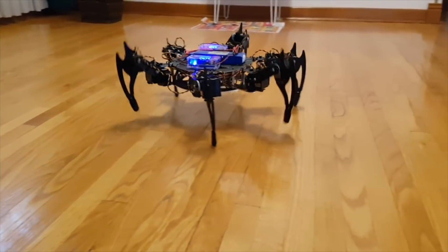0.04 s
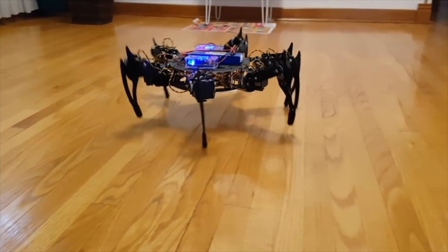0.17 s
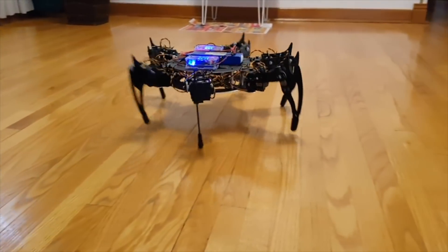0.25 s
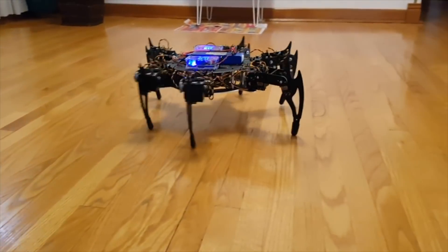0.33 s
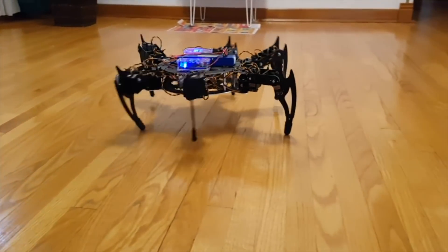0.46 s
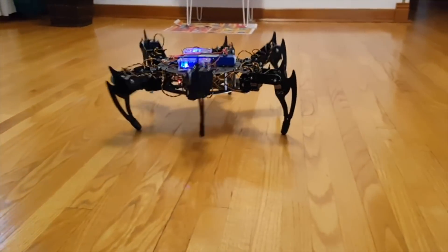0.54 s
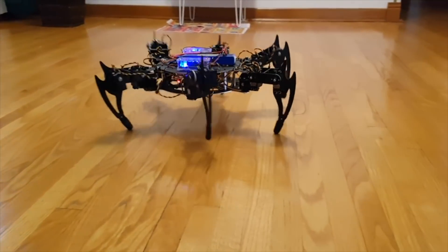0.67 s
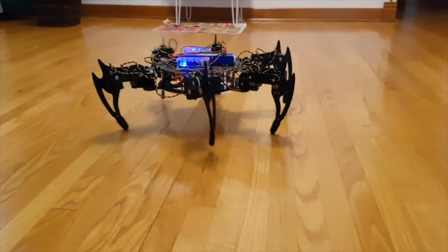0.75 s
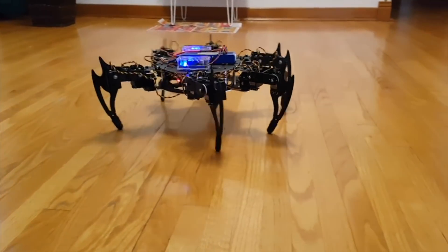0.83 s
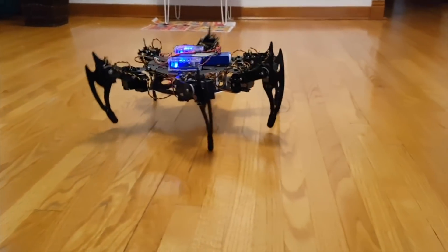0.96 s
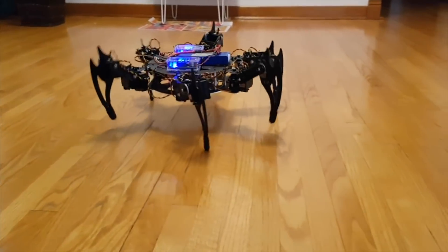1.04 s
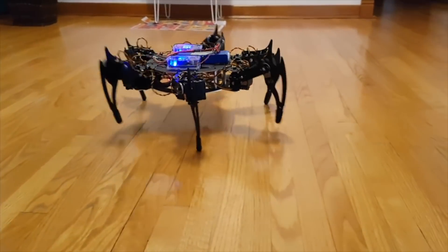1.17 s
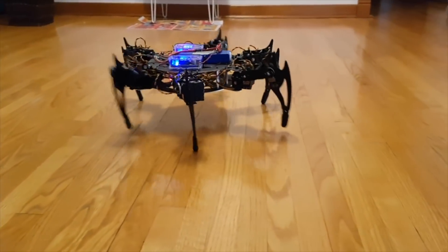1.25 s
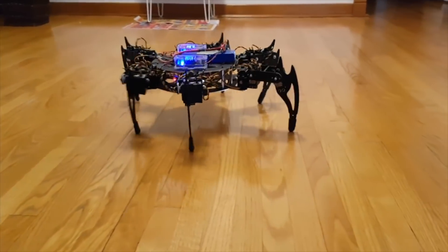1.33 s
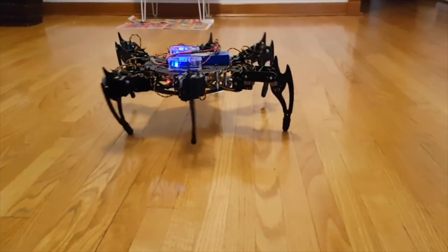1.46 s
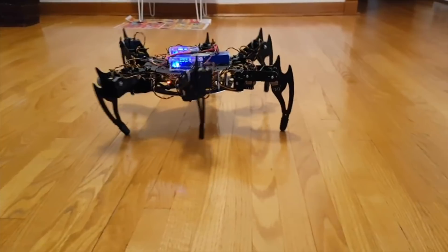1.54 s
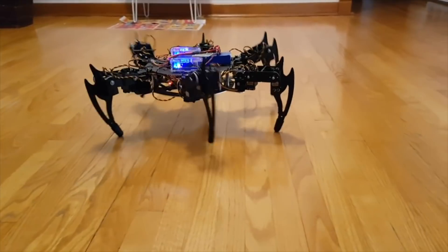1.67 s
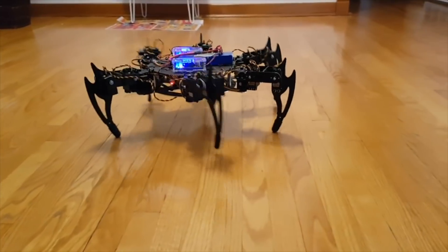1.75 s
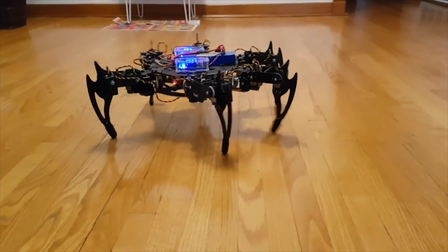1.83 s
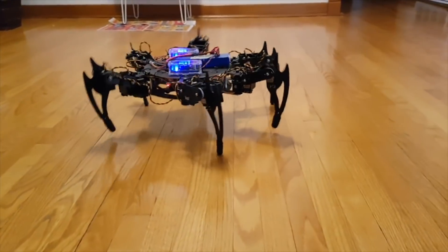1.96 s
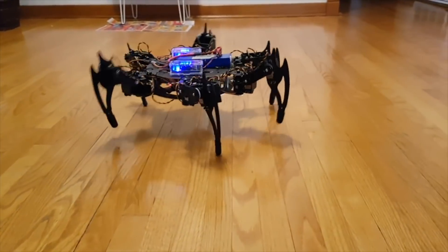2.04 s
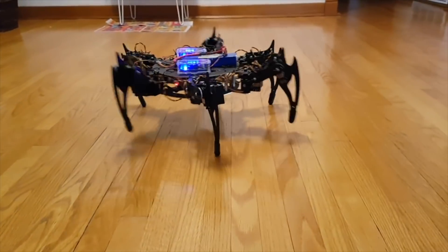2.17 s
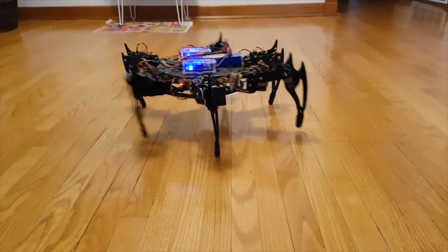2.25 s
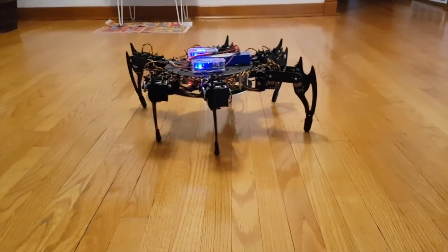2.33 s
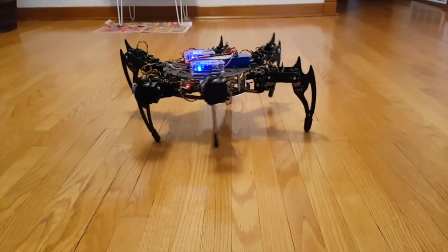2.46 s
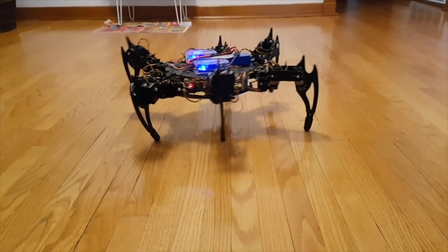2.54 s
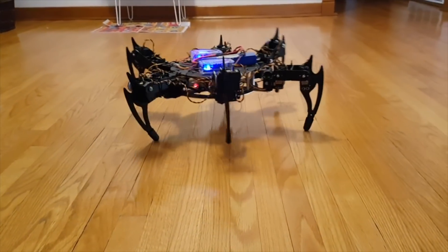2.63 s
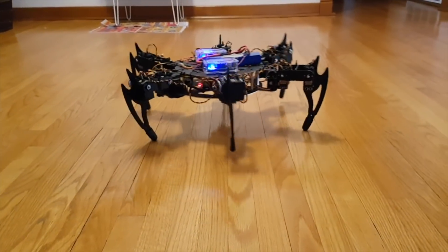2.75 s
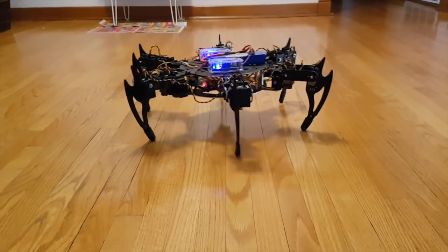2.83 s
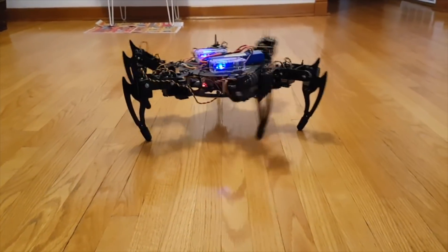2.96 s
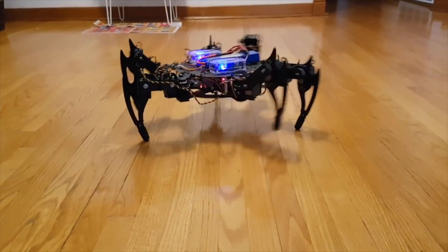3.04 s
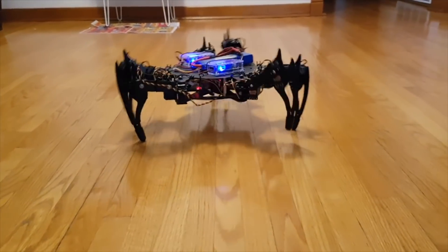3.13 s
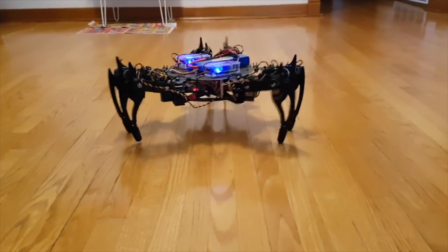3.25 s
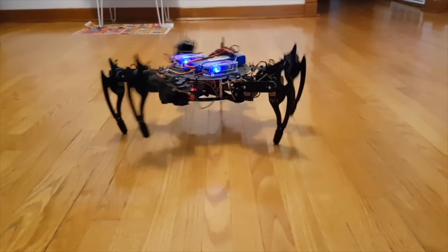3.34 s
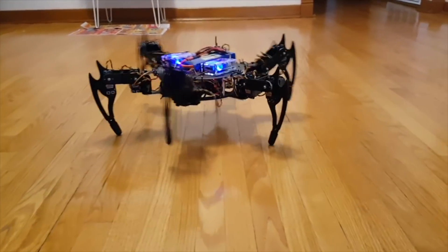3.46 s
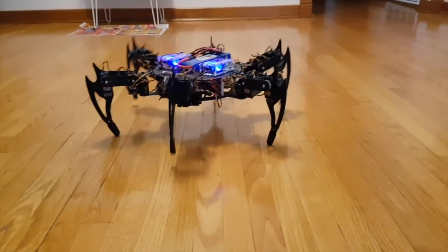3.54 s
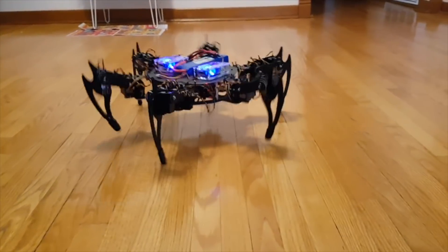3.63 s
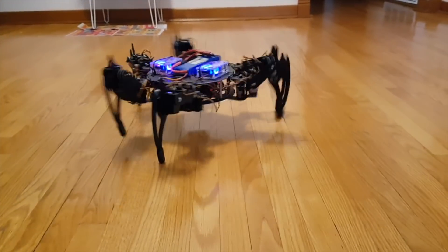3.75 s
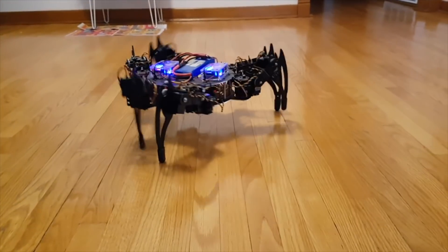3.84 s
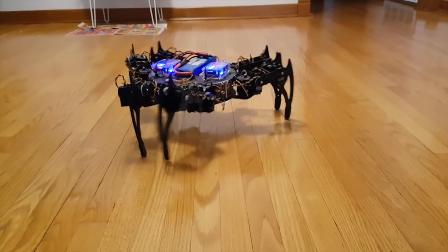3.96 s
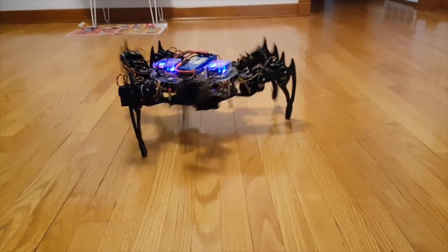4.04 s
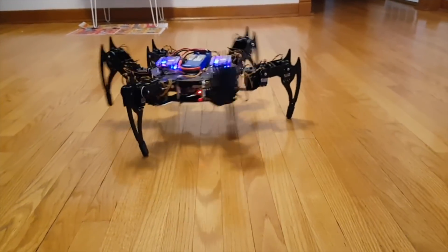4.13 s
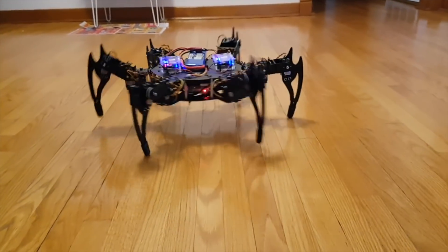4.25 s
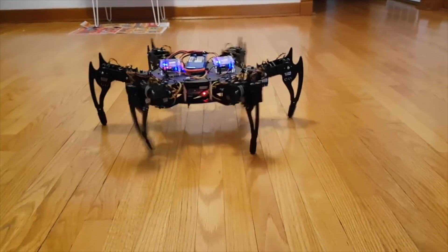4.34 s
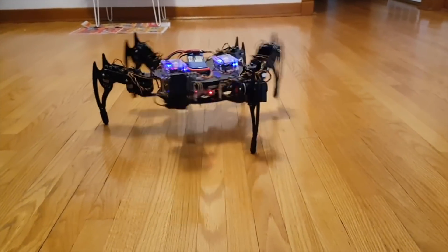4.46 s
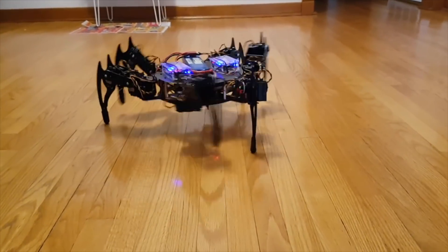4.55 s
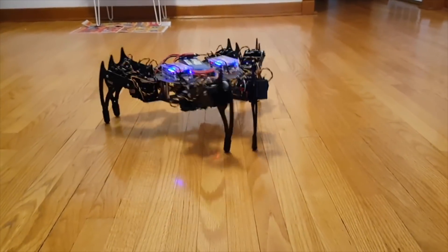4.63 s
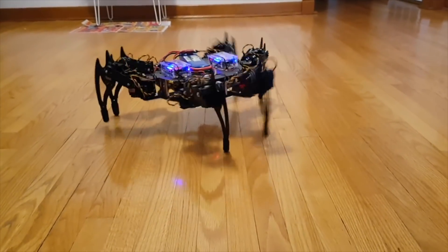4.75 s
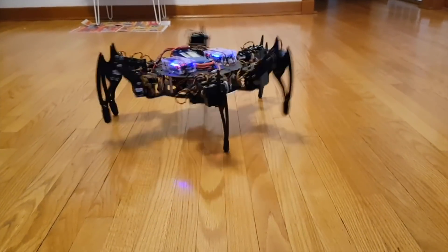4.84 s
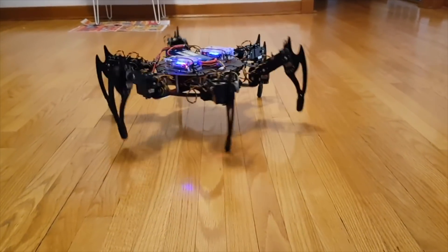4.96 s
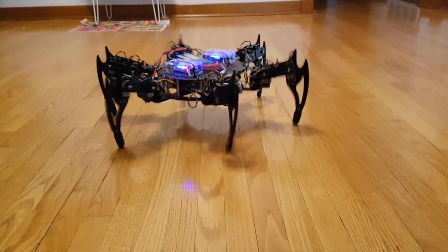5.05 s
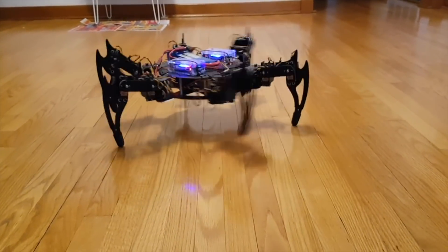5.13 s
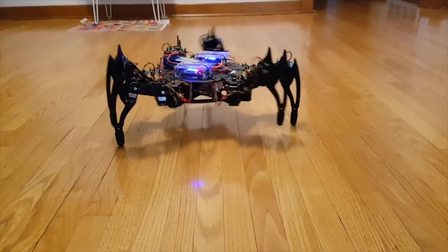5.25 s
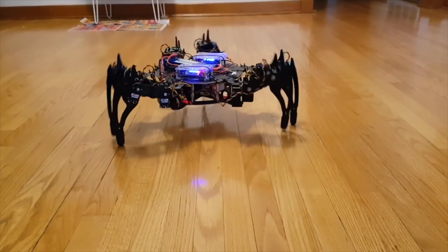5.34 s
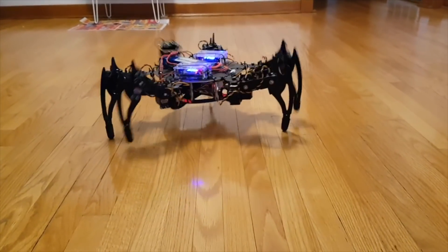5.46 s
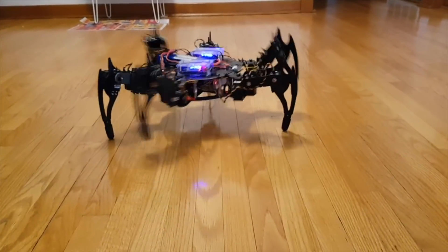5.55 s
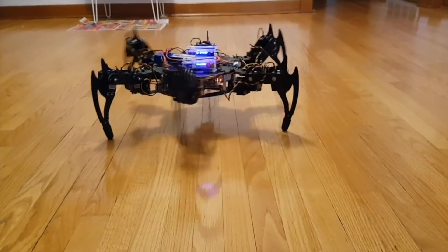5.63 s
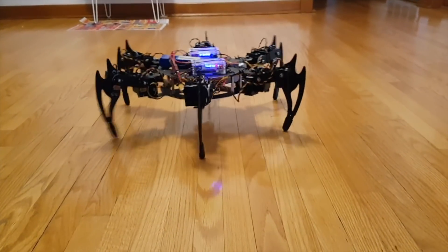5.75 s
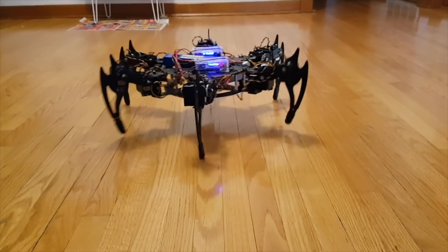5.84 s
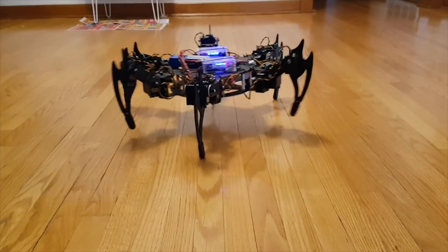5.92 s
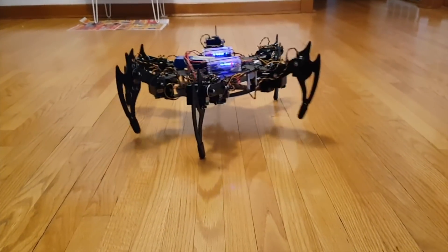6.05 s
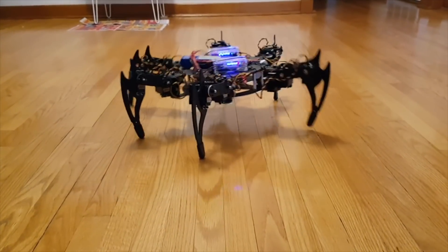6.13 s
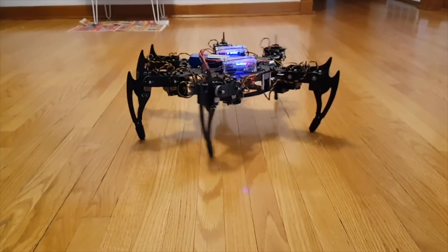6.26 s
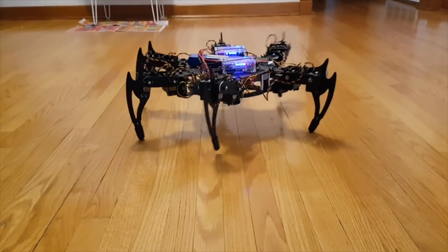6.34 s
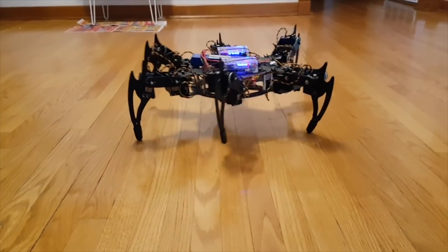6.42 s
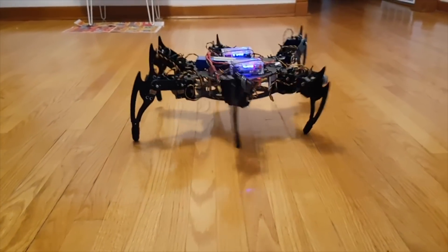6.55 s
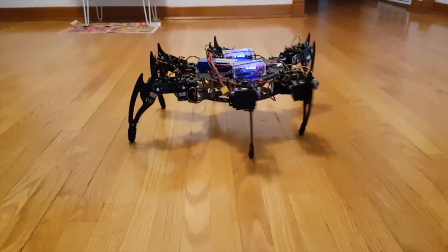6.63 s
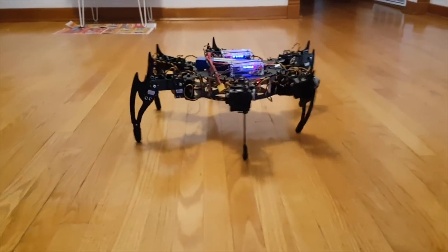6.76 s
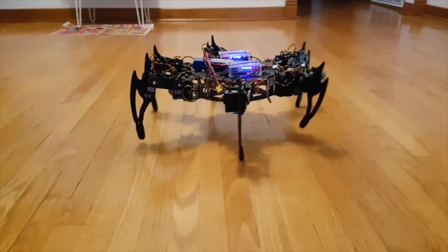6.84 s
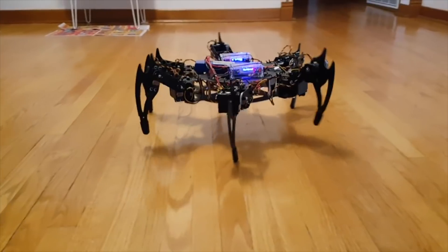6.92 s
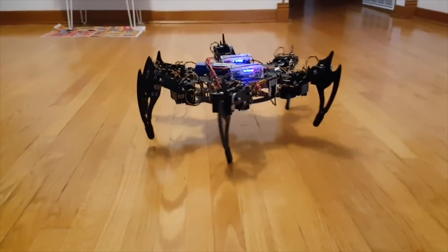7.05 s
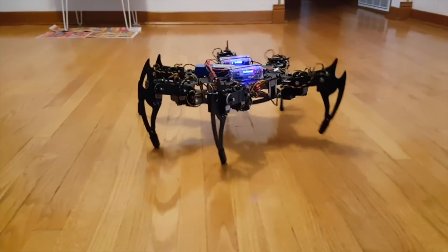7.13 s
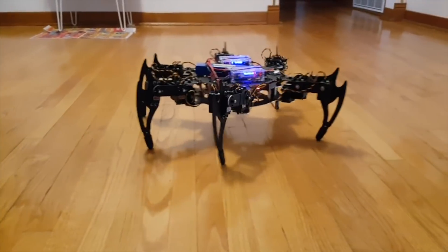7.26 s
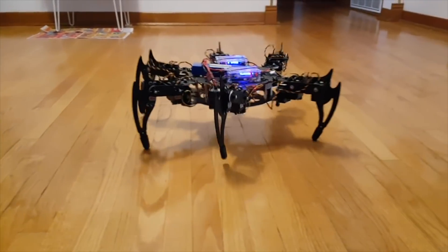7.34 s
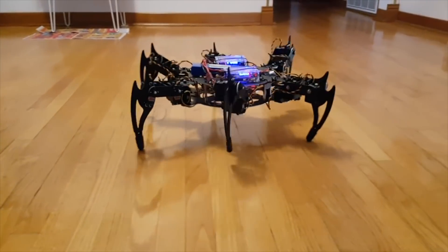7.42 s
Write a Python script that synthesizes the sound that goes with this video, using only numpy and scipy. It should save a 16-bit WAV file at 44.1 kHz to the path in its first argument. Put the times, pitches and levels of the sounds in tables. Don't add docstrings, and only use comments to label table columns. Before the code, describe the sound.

Close in a bare room, a small six-legged robot steps on wooden boards. Grainy servo chatter with a thin high whine pulses continuously over a low rumble and faint steady hiss. Soft muffled foot thuds come in little clusters every half second at first, then grow stronger and quicker with hard ticks as it turns, and finally ease back to lighter steps. The stereo pickup is near, with short room reverberation.

```python
import sys
import numpy as np
from scipy import signal
from scipy.fft import rfft, irfft
from scipy.io import wavfile

SR = 44100
rng = np.random.default_rng(int(sys.argv[2]) if len(sys.argv) > 2 else 0)


def convert_level_to_amplitude(level_db):
    exponent = np.asarray(level_db, float) / 20
    return 10 ** exponent


def dump_mix(stems):
    frames = np.atleast_2d(stems).T
    limited = np.clip(frames, -1, 1)
    pcm = np.round(limited * 32767).astype(np.int16)
    wavfile.write(sys.argv[1], SR, pcm)


N = 330309


def rms_one(x):
    return x / np.sqrt(np.mean(x ** 2) + 1e-20)


def in_time(rows):
    start_s, *columns = np.transpose(rows)
    return [np.interp(np.arange(N) / SR, start_s, column) for column in columns]


def at_hz(points, hz):
    table_hz, value = np.array(points)[:, 0], np.array(points)[:, 1]
    return np.interp(np.log(hz), np.log(table_hz), value)


def drift(rate_hz):
    pole = np.exp(-80 * np.pi * rate_hz / SR)
    noise = rng.standard_normal(N // 40 + 2002)
    slow = signal.lfilter([1], [1, -2 * pole, pole * pole], noise)[2000:]
    return np.interp(np.arange(N) / 40, np.arange(len(slow)), rms_one(slow))


# freq_hz [Hz], likeness [-1 to 1]
LIKENESS = [(60, 1), (180, 1), (550, 0.64), (1650, 0.19), (4970, 0.21), (15000, 0.012)]


def bands(source, low_hz, high_hz, count=3, apart=0):
    edges = 25 * 2 ** (np.arange(10 * count) / count)
    edges = edges[(edges >= low_hz) & (edges <= high_hz)]
    for k, (low, high) in enumerate(zip(edges, edges[1:])):
        band_pass = signal.butter(2, [low, high], "band", fs=SR, output="sos")
        mid, side = signal.sosfilt(band_pass, source[k % 2])
        hz = np.sqrt(low * high)
        alike = np.clip(at_hz(LIKENESS, hz) - apart, -.5, .94)
        yield hz, np.sqrt(1 + alike) * mid + np.sqrt(1 - alike) * side * [[1], [-1]]


def whine(pitch_hz, width_hz):
    wobble = rng.standard_normal((2, N)) + 1j * rng.standard_normal((2, N))
    narrow = signal.sosfilt(signal.butter(2, width_hz / 2, fs=SR, output="sos"), wobble)
    carrier = np.exp(2j * np.pi * np.cumsum(pitch_hz) / SR)
    return rms_one((narrow * carrier).real)


def strike(modes, rise_s):
    t = np.arange(SR // 3) / SR
    hz, level_db, t60_s = np.transpose(modes)[:, :, None]
    ringing = convert_level_to_amplitude(level_db - 60 * t / t60_s) * np.sin(2 * np.pi * hz * t)
    return (1 - np.exp(-t / rise_s)) * np.sum(ringing, axis=0)


def varied(modes, luck, spread, spread_db):
    hz, level_db, t60_s = np.transpose(modes)
    return np.transpose([hz * (1 + spread * luck[0]), level_db + spread_db * luck[1], t60_s])


def add(track, sound, start_s):
    at = round(start_s * SR)
    track[at:at + len(sound)] += sound[:N - at]


# [upper board modes, dB]
FIRST_FEET = [(0.386, -23.5, 161, -8), (0.881, -41.5, 209, 4.5), (1.411, -36, 160, -3),
              (1.891, -26, 145, -10), (2.396, -39.5, 148, 2), (2.867, -23.5, 143, -19.5),
              (3.2989, -23.5, 223, -11.5), (3.688, -13.5, 165, -5.5), (4.008, -26, 178.3, -12.5),
              (4.416, -17.5, 270, -11), (4.705, -15.5, 179, -19.5), (5.1313, -18, 149, -5.5),
              (5.459, -25, 208, -3), (5.85, -12.5, 188.4, -14), (6.204, -24, 154, -3),
              (6.7347, -25.5, 260, 0), (7.2353, -23.5, 113.2, -5.5)]
SECOND_FEET = [(0.394, -24, 163, -27.5), (0.89, -25.5, 143, -14), (1.422, -27, 187, -12),
               (1.929, -28, 167, -38), (2.407, -24, 136, -30), (2.893, -23, 187, -33),
               (3.348, -13, 193, -9.5), (3.703, -7.5, 165.4, -10.5), (4.021, -20.5, 139, -12),
               (4.428, -8.5, 199, -6.5), (4.724, -21.5, 169, -28.5), (5.155, -7, 177, -8),
               (5.481, -19, 152, -7.5), (5.868, -10.5, 142, -13), (6.223, -18.5, 189, -6.5),
               (6.756, -23, 128, -12), (7.255, -20, 168, -44)]
THIRD_FEET = [(0.415, -32.5, 117, -6), (0.941, -31, 139, -19), (1.455, -44, 162, -10),
              (2.447, -30.5, 164, -29), (2.925, -28, 138, -30), (3.364, -19, 189, -24),
              (3.726, -25, 182, -19), (4.06, -18.5, 189, -29), (4.453, -12.5, 153, -8),
              (4.77, -28.5, 170.7, -13), (5.196, -26, 151, -20), (5.532, -24.5, 186, -14),
              (5.894, -21, 165, -14.5), (6.235, -12.5, 179, -33), (6.799, -31, 183, -16),
              (7.316, -24.5, 173, -32)]
STRAY_FEET = [(2.983, -35, 169, -18), (3.308, -20.5, 165, -6), (3.323, -33, 184, -8),
              (3.414, -38, 153, -25), (4.054, -29.5, 234, -22), (5.146, -19.5, 184, -8),
              (6.245, -16.5, 178.4, -27), (6.286, -30, 188, -3), (6.292, -29.5, 184, -20),
              (6.8076, -19, 154, -26), (7.287, -23, 156, -30), (7.338, -25.5, 185, -30),
              (7.358, -33.5, 170, -33.5), (7.378, -34.5, 163, -30), (5.504, -21, 170, -21.5),
              (6.828, -31, 152, -18)]


def landings():
    last = np.array(THIRD_FEET)
    rebounds = last + [0.057, -17, 0, 0]
    return np.vstack([FIRST_FEET, SECOND_FEET, last, rebounds, STRAY_FEET])


# freq_hz [Hz], level_db [dB per Hz]
HISS_SPECTRUM = [(300, -5), (1000, -2.5), (2200, -1), (4000, -5.5), (13000, -14), (15500, 0.5)]
HISS_DB = -54.5


def hiss():
    slices = bands(rng.standard_normal((2, 2, N)), low_hz=240, high_hz=17000)
    return convert_level_to_amplitude(HISS_DB) * rms_one(sum(convert_level_to_amplitude(at_hz(HISS_SPECTRUM, hz)) * band for hz, band in slices))


# start_s [s], level_db [dB]
RUMBLE_LEVEL = [(0.0, -53), (1.8, -51.5), (3.2, -51), (4.2, -50), (5.3, -54.5), (6.4, -54), (7.49, -55.5)]
# freq_hz [Hz], level_db [dB per Hz]
SHAKE_SPECTRUM = [(15, -36), (25, -5.5), (75, -8.5), (107, -0.5), (201, -12), (263, -17.5), (366, -49),
                  (389, -21), (502, -23), (900, -34), (1170, -61), (1980, -120)]
AFTER_DB, AFTER_T60_S = -22.5, 0.27


def rumble():
    blows = np.zeros(N)
    for start_s, level_db, *_ in landings():
        blows[round(start_s * SR)] += convert_level_to_amplitude(level_db + AFTER_DB)
    after = signal.lfilter([1], [1, -convert_level_to_amplitude(-60 / (AFTER_T60_S * SR))], blows)
    steady = convert_level_to_amplitude(in_time(RUMBLE_LEVEL)[0] + 0.5)
    deep, hum = np.zeros((2, 2, N))
    for hz, band in bands(rng.standard_normal((2, 2, N + SR // 4)), low_hz=24, high_hz=1100):
        settled = band[:, -N:]
        part = convert_level_to_amplitude(at_hz(SHAKE_SPECTRUM, hz) + 1.84 * drift(6.8)) * settled
        if hz < 60:
            deep = deep + part
        else:
            hum = hum + part
    return (steady * deep + (steady + after) * hum) / np.std(deep + hum)


# start_s [centre, s], level_db [dB], length_s [s]
GROANS = [(.47, -59, 0.046), (.97, -61, 0.051), (1.45, -60, 0.043), (1.944, -55, 0.047), (2.47, -54, 0.055)]
GROAN_HZ = 1350


def groans():
    t = np.arange(N) / SR
    swell = sum(convert_level_to_amplitude(level_db) * np.exp(-.5 * ((t - start_s) / length_s) ** 2)
                for start_s, level_db, length_s in GROANS)
    return swell * whine(np.full(N, float(GROAN_HZ)), width_hz=130)


# [drop at the reversal, dB]
WALK_STROKES = [(-.05, -45.5, -5, -6, -11.5), (0.193, -45.5, 0.5, -4.5, 6.5), (0.451, -44.5, -5, -6, 2.5),
                (.70, -45, -2.5, -2.5, 4), (0.946, -44.5, -5.5, -6, 5.5), (1.192, -46, 0.5, -3.5, 4.5),
                (1.448, -45, -4.5, -5, 2), (1.70, -45, -2.5, -3, 4), (1.958, -45.5, -4, -5.5, 4),
                (2.191, -46.5, 0.5, -4, 5.5), (2.45, -44, -4.5, -7, 2), (2.701, -46, -4, -6, 4),
                (6.073, -46, -2, -9, 5), (6.349, -44, -4, -6, 7), (6.59, -45, -3.5, -5, 5.5),
                (6.829, -44.5, -2, -5.5, 5), (7.099, -45, -1.5, -4.5, 6), (7.328, -44.5, -4.5, -9, 5.5)]
TURN_STROKES = [(2.954, -40.5, -2, -2.5, 14), (3.29, -41.5, -2.5, -4.5, 5.5),
                (3.441, -43.5, -1.5, -2.5, -4), (3.65, -43.5, -0.5, -3, 3), (3.769, -42.5, -2.5, -1, -3),
                (3.967, -41.5, -2, -4.5, 6), (4.099, -41.5, -2, -2.5, 3), (4.386, -42, -3, -4, 5.5),
                (4.53, -42, -1.5, -0.5, -3.5), (4.683, -41, -3, -6.5, 2.5), (4.88, -43, 0, -1.5, -2.5),
                (5.099, -42.5, -2, -4.5, 5.5), (5.231, -43, -2, -2.5, -4), (5.43, -40.5, -2.5, -6, 6),
                (5.619, -43, 0.5, -1.5, -1.5), (5.83, -45.5, -4.5, -9, 1.5)]
# sag_db [fall along a stroke, dB], share [of the pause, ratio]
WALK_GAIT = ((-.6, -1.555, 3.1), (1.1, .4, 0.28))
TURN_GAIT = ((1.35, -0.0013, 1), (0.68, -0.0307, 0.022))
JOLT_SHARE, JOLT_S = 0.26, 0.055
PAUSE_S = 0.03


def effort():
    rows = [(*row, *WALK_GAIT) for row in WALK_STROKES] + [(*row, *TURN_GAIT) for row in TURN_STROKES]
    rows = sorted(rows)
    ends = [row[0] for row in rows[1:]] + [N / SR + 0.078]
    t = np.arange(N) / SR
    points, pauses_db, jolts_db = [], 0, 0
    for (start_s, *levels_db, pause_db, sag_db, shares), end_s in zip(rows, ends):
        for part in (.2, .8):
            sagged_db = np.array(levels_db) + (.5 - part) * np.array(sag_db) * 2
            points.append((start_s + part * (end_s - start_s), *sagged_db))
        dip = np.exp(-.5 * ((t - start_s) / PAUSE_S) ** 2)
        pauses_db = pauses_db + np.outer(shares, pause_db * dip)
    for first, second in zip(FIRST_FEET, SECOND_FEET):
        jolt_s = (first[0] + second[0]) / 2
        jolt_db = np.clip(JOLT_SHARE * (second[1] + 28), 0, 6)
        jolts_db = jolts_db + jolt_db * (t > jolt_s) * np.exp(-np.abs(t - jolt_s) / JOLT_S)
    return in_time(points) - pauses_db + np.outer([1, -1, -1], jolts_db)


# freq_hz [Hz], level_db [dB per Hz]
GEAR_SPECTRUM = [(1100, -20), (1400, -15), (2490, -15), (3300, -7.5), (4300, -6), (5300, -7.5),
                 (6200, -6.5), (7340, -4.5), (8200, -6), (9100, -1.5), (10400, -5), (13200, -9),
                 (13900, -21.5), (15800, -31)]
MESH_HZ, MESH_HZ_PER_DB = 5440, 55
AIR_HOLD = 0.45


def servos():
    chatter_db, whistle_db, top_db = effort()
    mesh_hz = MESH_HZ + MESH_HZ_PER_DB * whistle_db + 150 * drift(6.0)
    sizes = convert_level_to_amplitude(1.6 * np.minimum(rng.exponential(1, (2, 2, N)), 5)) * rng.choice([-1, 1], (2, 2, N))
    knocks = rms_one(sizes * (rng.random((2, 2, N)) < 9000 / SR))
    load_db = 1.55 * drift(13.8) + 0.41 * drift(170)
    chatter = 0
    for hz, band in bands(knocks, low_hz=780, high_hz=15800, count=5):
        whistle, top = np.clip(np.log2(hz / [6600, 10000]) * 11.0, 0, 1)
        lift_db = whistle * (1 - top) * (whistle_db - 3.5) + top * (top_db + 4.0)
        lift_db = lift_db - (hz > 13200) * AIR_HOLD * (chatter_db + top_db + 37.5)
        chatter = chatter + convert_level_to_amplitude(at_hz(GEAR_SPECTRUM, hz) + lift_db + load_db + 1.6 * drift(26.0)) * band
    main_db = -7.5 + 1.3 * (chatter_db + 42.5) + load_db + 2.0 * drift(15)
    main = convert_level_to_amplitude(main_db) * whine(mesh_hz, width_hz=290)
    others = 0
    for hz in (4460, 4880, 5570, 6010):
        fits = convert_level_to_amplitude(-10 + 2.4 * drift(15.0))
        others = others + fits * whine(hz * (1 + .03 * drift(4.3)), width_hz=330)
    motor_db = whistle_db - 2.5 + load_db + 1.0 * drift(39)
    motor = convert_level_to_amplitude(motor_db) * whine(np.full(N, 9150.), width_hz=1200)
    return convert_level_to_amplitude(chatter_db + 4.5) * rms_one(rms_one(chatter) + main + others + motor)


# freq_hz [Hz], t60_s [s]
ROOM_T60 = [(80, 0.2), (200, 0.33), (600, 0.56), (2000, 0.37), (6000, 0.61)]
# freq_hz [Hz], level_db [dB against the direct sound]
ROOM_WET = [(80, 3), (185, -7.5), (270, -7.5), (600, -6), (1000, -3.5), (1400, 0), (2200, -3.5),
            (3600, -4.5), (6000, -20)]


def room(x):
    t = np.arange(SR // 2) / SR
    tail = 0
    for hz, band in bands(rng.standard_normal((2, 2, len(t))), low_hz=38, high_hz=9000, apart=0.058):
        dying = convert_level_to_amplitude(-60 * t / at_hz(ROOM_T60, hz)) * np.clip((t - .004) / 0.0017, 0, 1)
        tail = tail + convert_level_to_amplitude(at_hz(ROOM_WET, hz)) * band * dying / np.sqrt(np.sum(dying ** 2))
    return x + signal.fftconvolve(x[None], tail, axes=1)[:, :N]


# [tip, Hz]
TICKS = [(0.386, -39, -1, 3470), (0.412, -35, -3, 3550), (0.451, -38, 1, 2920), (0.944, -38, -6, 1750),
         (1.411, -38, -7, 2430), (1.943, -41, 6, 1800), (2.412, -36, -1, 3770), (2.467, -40.5, 4, 3940),
         (3.331, -23.5, -12, 2314), (3.3496, -41, -11, 2200), (3.689, -32, 0.5, 2490),
         (3.693, -20, -0.5, 3400), (3.711, -35, -26, 2200), (4.019, -39, 1, 1740), (4.4286, -16, 0.5, 2500),
         (4.44, -17.5, -9.5, 2200), (4.707, -63, 14, 3230), (5.1324, -20, -5.5, 1970),
         (5.148, -19.5, -3, 2010), (5.4622, -39, 12, 2010), (5.477, -40, 7, 2010), (5.853, -42, 10, 2960),
         (5.87, -34, 0.5, 1530), (6.206, -39.5, 1.5, 1640), (6.227, -33, -3.5, 2000),
         (6.286, -31, -9, 1420), (6.738, -42, 5.5, 3310), (7.2416, -33.5, 3.5, 1990),
         (7.253, -39, -4, 1870), (6.7417, -38.5, 8, 3200), (3.353, -34, -12, 2200),
         (5.152, -28.5, -2, 1890)]
# freq_hz [Hz], level_db [dB], t60_s [s]
LEGS = [(585, -7.5, 0.074), (760, -9, 0.03), (966, 2.5, 0.025), (1370, 0, 0.018), (1570, 0.5, 0.021),
        (2200, 3.5, 0.012), (2560, 3, 0.0064), (3000, 0, 0.0098)]
TIP_GRIPS = 29
SCUFF_DB = -42
SNAP_RISE_S, RING_RISE_S = .0005, 0.00064
RATTLE_DB, RATTLE_T60_S = -14.5, 0.12


def ticks():
    out = np.zeros(N)
    chance = np.resize(rng.standard_normal((TIP_GRIPS, 2, len(LEGS))), (len(TICKS), 2, len(LEGS)))
    cracks = np.resize(rng.standard_normal((TIP_GRIPS, 3, SR // 3)), (len(TICKS), 3, SR // 3))
    dull = signal.butter(2, [480, 1250], "band", fs=SR, output="sos")
    broad = signal.butter(2, [1300, 4200], "band", fs=SR, output="sos")
    t = np.arange(SR // 3) / SR
    bright_share = np.clip(np.log2(np.array(LEGS)[:, 0] / 1100), 0, 1)
    for (start_s, level_db, bright_db, tip_hz), luck, (low, wide, high) in zip(TICKS, chance, cracks):
        hard = np.clip((level_db + max(bright_db, 0) - SCUFF_DB) / 9, 0, 1)
        snap = hard * convert_level_to_amplitude(-60 * t / 0.014) * (1 - np.exp(-t / SNAP_RISE_S))
        rattle = convert_level_to_amplitude(RATTLE_DB - 60 * t / RATTLE_T60_S) * (1 - np.exp(-t / 0.005))
        contact = snap + (1 + 2.1 * (1 - hard)) * rattle
        modes = varied(LEGS, luck, 0.047, 0.58) + np.outer(bright_share * bright_db, [0, 1, 0])
        ring = strike(modes, RING_RISE_S)
        sharp = signal.butter(2, [tip_hz / 1.48, tip_hz * 1.21], "band", fs=SR, output="sos")
        top = convert_level_to_amplitude(8.0) * signal.sosfilt(broad, wide * contact)
        top += convert_level_to_amplitude(12.0) * signal.sosfilt(sharp, high * contact)
        top += hard * strike([(tip_hz, 9, .009)], RING_RISE_S)
        body = convert_level_to_amplitude(11.5) * signal.sosfilt(dull, low * contact)
        tick = hard * ring + body + convert_level_to_amplitude(bright_db) * top
        add(out, convert_level_to_amplitude(level_db - 6.0) * tick, start_s - .0007)
    return out


# freq_hz [Hz], level_db [dB], t60_s [s]
JOISTS = [(66, -1, 0.11), (98, -3, 0.077), (120.6, -8.5, 0.22)]
BOARDS = [(255.3, -2.5, 0.086), (298, -11.5, 0.082), (360.6, -3.5, 0.11), (422, -5.5, 0.072),
          (476, -5, 0.087), (538.4, -2, 0.059), (592.5, -2.5, 0.052), (683, -9.5, 0.071), (790, -13, 0.048),
          (942, -25, 0.054), (1028, -17.5, 0.081)]
FLOOR_SPOTS = 77
CONTACT_S = .005
BOOM_DB, BOOM_GROWTH = -41, 0.23


def thuds():
    feet = landings()
    out = np.zeros(N)
    chance = np.resize(rng.standard_normal((FLOOR_SPOTS, 2, len(BOARDS))), (len(feet), 2, len(BOARDS)))
    for (start_s, level_db, board_hz, upper_db), luck in zip(feet, chance):
        boom_db = BOOM_DB + BOOM_GROWTH * (level_db + 29) - level_db
        board = strike([(board_hz, 3, .06), (270 + 15 * luck[0, -1], -7, .04)], CONTACT_S)
        joists = varied(JOISTS, luck[:, :len(JOISTS)], 0.1, 0.35)
        boom = convert_level_to_amplitude(boom_db + 6.0) * strike(joists, rise_s=0.011)
        upper = convert_level_to_amplitude(upper_db - 6) * strike(varied(BOARDS, luck, 0.018, 5.0), rise_s=0.0022)
        add(out, -convert_level_to_amplitude(level_db) * (board + boom + upper), start_s + .0004)
    high_pass = signal.butter(6, 66, "high", fs=SR, output="sos")
    return signal.sosfilt(high_pass, out)


def scene():
    return room(thuds() + ticks()) + servos() + rumble() + hiss() + groans()


def band_limit(x):
    return signal.sosfilt(signal.butter(12, 15750, fs=SR, output="sos"), x)


# [left minus right, dB]
PORTS = [(60, -2.5), (120, -0.5), (240, -2.5), (480, -0.5), (950, -0.5), (1890, 0), (3770, -6.5),
         (7520, -6.5), (15000, 2)]


def record(dry):
    size = N + 467
    lean_db = at_hz(PORTS, np.fft.rfftfreq(size, 1 / SR) + 1) / 2
    ported = irfft(rfft(dry, size) * convert_level_to_amplitude(lean_db * [[1], [-1]]), size)[:, :N]
    top_cut = signal.cheby2(20, 60, 16250, fs=SR, output="sos")
    return band_limit(signal.sosfilt(top_cut, ported))


dry = scene()
out = record(dry)
dump_mix(out)
```